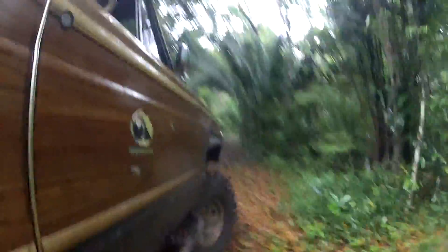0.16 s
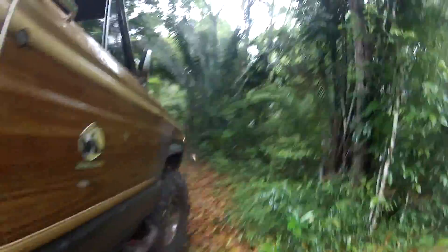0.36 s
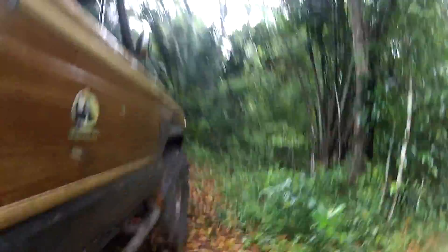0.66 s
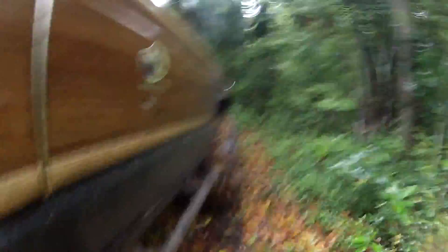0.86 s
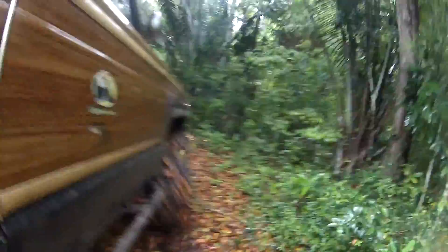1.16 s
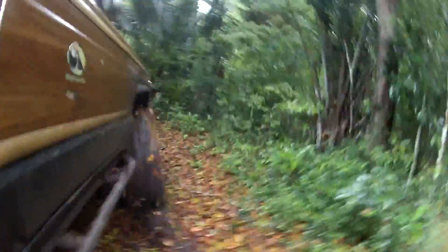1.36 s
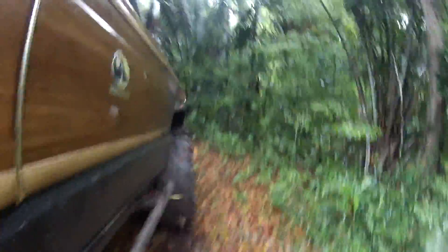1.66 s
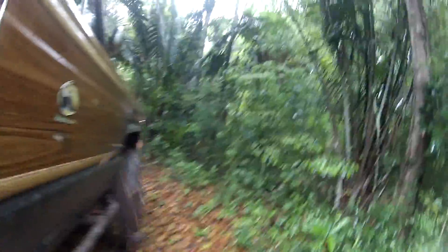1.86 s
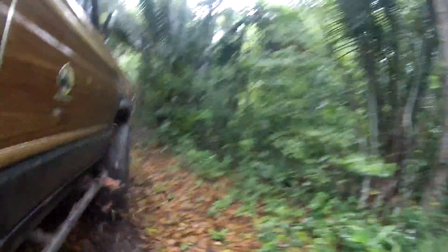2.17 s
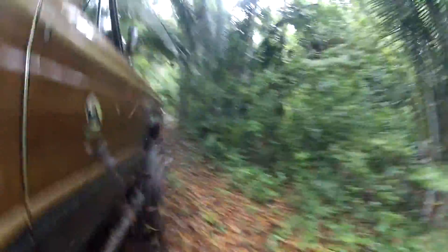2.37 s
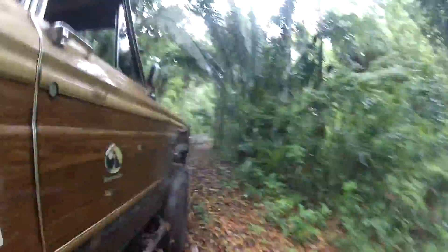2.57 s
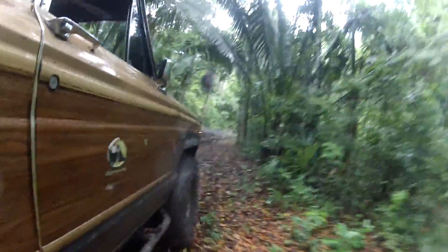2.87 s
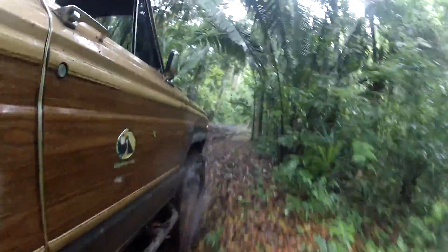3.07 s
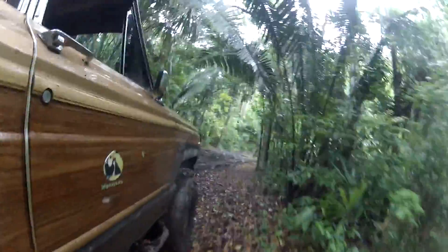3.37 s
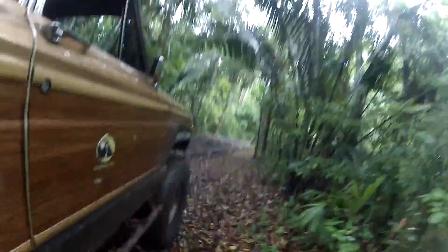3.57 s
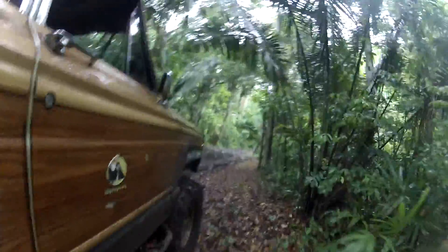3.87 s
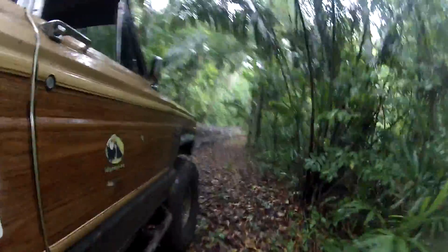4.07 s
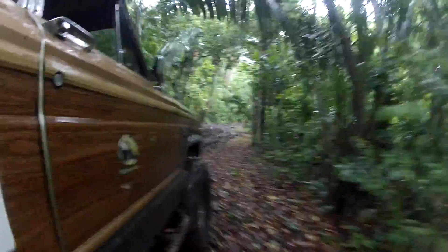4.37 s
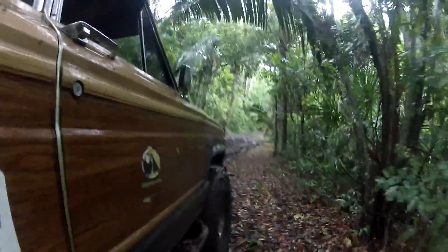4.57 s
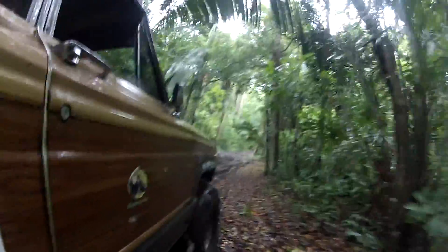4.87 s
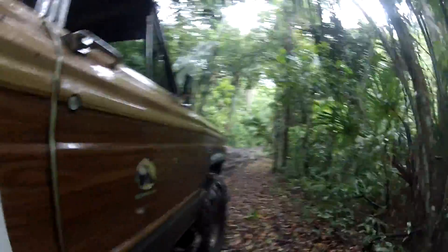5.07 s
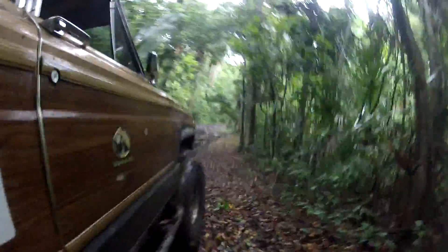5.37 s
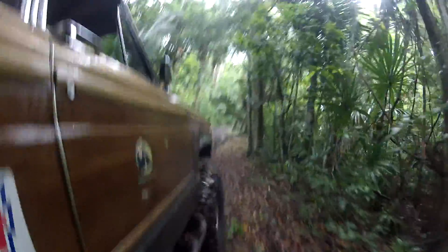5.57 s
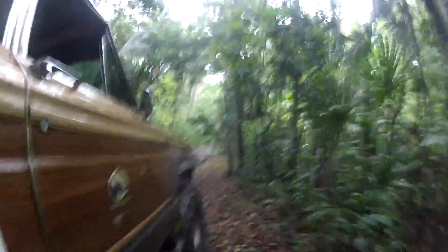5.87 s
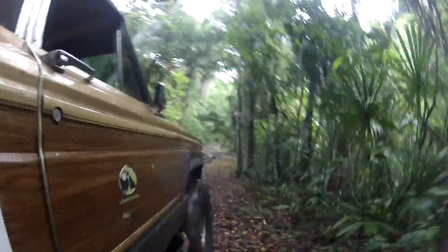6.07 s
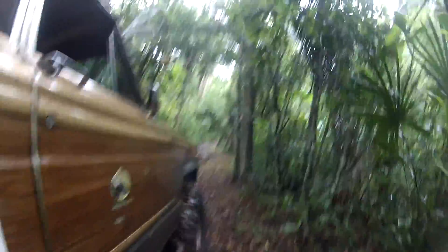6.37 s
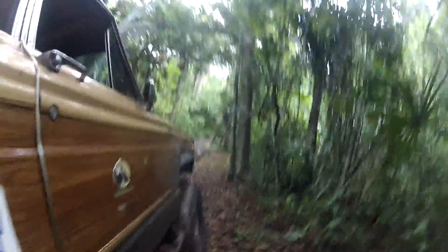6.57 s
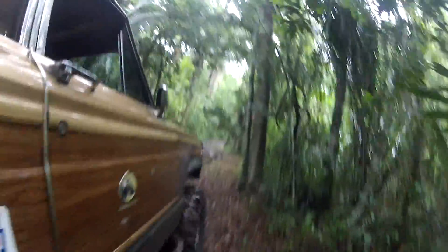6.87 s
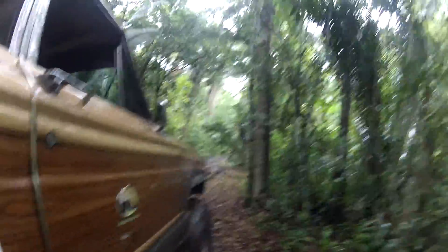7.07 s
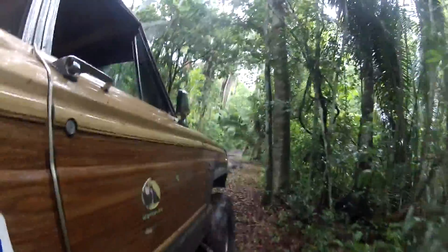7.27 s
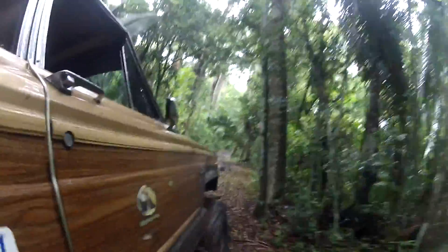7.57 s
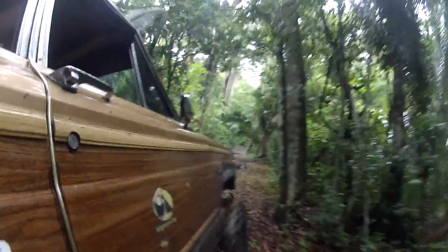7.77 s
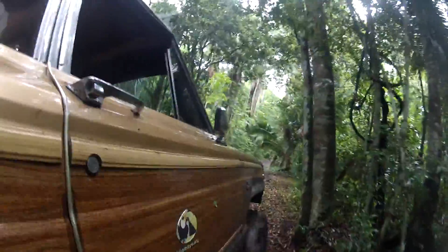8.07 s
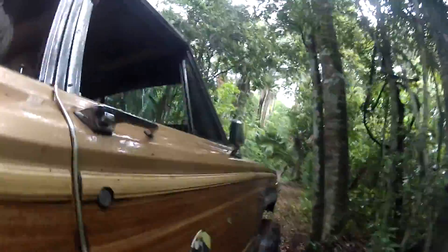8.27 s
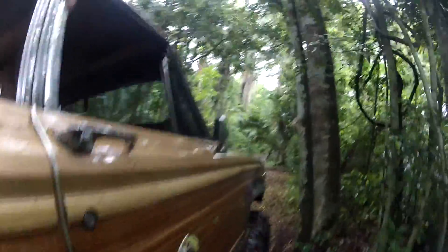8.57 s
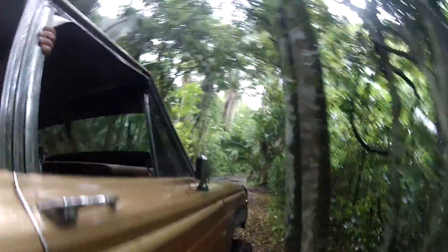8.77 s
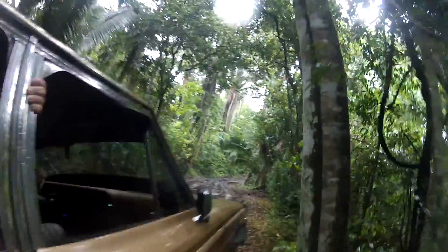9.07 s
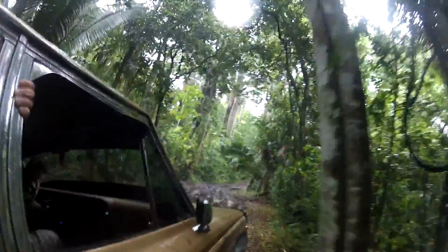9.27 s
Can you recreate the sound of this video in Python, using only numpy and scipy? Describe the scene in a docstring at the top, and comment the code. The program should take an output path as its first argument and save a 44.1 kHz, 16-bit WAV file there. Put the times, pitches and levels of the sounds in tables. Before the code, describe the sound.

An old V8 off-road truck crawls over a rutted forest track, heard close, just outside a side window. It opens with a brief rev, a knock and a low body thump. The revs sag, and a cluster of thumps comes between 0.7 and 1 second, ending in two faint metallic pings. From 1 to 2.4 seconds the engine climbs with a hard, rasping exhaust bark; a stone cracks brightly against metal at 1.7 seconds, and another thump lands at 2.4. Shorter throttle bursts follow around 2.8, 3.4 and 4 seconds, the revs dipping between them. From about 4.3 seconds the engine holds a quieter, loping tick-over with faint fan rush and valve clatter over low tyre rumble. Light clicks of twigs and loose fittings are scattered through the later part, with a knock and thump at 6.7 seconds and a stronger group near 8.8. The engine keeps throbbing until about 9.4 seconds.

```python
"""The exhaust of an old V8 off-road truck, heard just outside the side window on a rutted forest track.
Eight unequal gas pulses a cycle excite the pipe's resonances: under throttle their fronts steepen into
a bark, then the engine settles to a loping tick-over. The fan rushes and the valve gear clatters.
As the truck crawls along, impacts make its body knock and thump, a stone strikes it and the tyres rumble."""
import sys
import numpy as np
from scipy import signal
from scipy.fft import rfft, irfft, next_fast_len
from scipy.io import wavfile
from scipy.ndimage import map_coordinates

SR = 44100
rng = np.random.default_rng(int(sys.argv[2]) if len(sys.argv) > 2 else 0)


def wav_out(sig):
    """Save sig, one row per channel (or a flat mono array), as 16-bit PCM at SR to the path in sys.argv[1]."""
    wavfile.write(sys.argv[1], SR, np.round(np.clip(np.atleast_2d(sig).T, -1, 1) * 32767).astype(np.int16))


N = 415863

# Engine speed. Each row: time in seconds, firings per second.
FIRING_RATE = [(0.0, 119.2), (0.15, 120.7), (0.28, 97.1), (0.92, 63.4), (1.08, 99.9), (1.29, 116.2),
               (1.56, 119.8), (1.93, 133.1), (2.43, 137.7), (2.69, 103.2), (3.03, 108.8), (3.2, 59.0),
               (3.44, 109.2), (3.67, 114.8), (3.92, 60.9), (4.32, 78.7), (4.76, 77.5), (5.4, 78.4),
               (7.0, 77.5), (8.2, 75.2), (9.43, 77.0)]
# Pushes of the pedal. Each row: press, lift and time to open in seconds, opening from 0 to 1.
PEDAL_PUSHES = [(-.1, 0.114, 0.075, 0.75), (0.83, 0.976, .1, 0.98), (0.999, 2.448, 0.11, 0.92),
                (2.56, 2.966, 0.29, 0.96), (3.15, 3.281, 0.12, 0.93), (3.237, 3.639, 0.15, 0.97),
                (3.857, 4.12, .17, 0.7)]
# Cylinders in firing order. Each row: idle lag in firings, idle level in dB, loaded lag in firings,
# loaded level in dB, valve tap level in dB. The levels are relative.
FIRING_ORDER = [(0.811, -2, 0.593, 1, 6.5), (1.043, 0.5, 0.584, 4.5, -1), (1.04, -2, 0.703, 9, 1),
                (1.073, 5, 0.547, 7.5, 10), (1.156, 3, 0.777, -3.5, 10.5), (1.06, 5, 0.784, 6, 7),
                (0.833, -3.5, 0.596, 9, -7), (1.239, -1, 0.625, 6.5, 7.5)]
# Each cylinder's steep front. Each row: lag in firings, relative level at full load in dB.
STEEP_FRONTS = [(.9, -12), (.48, -1.5), (.64, 0), (.95, -11), (.55, -2), (.78, -5), (.32, -9), (.63, 1.5)]
# Standing waves of the tail pipe. Each row: frequency in Hz, bandwidth in Hz, relative gain in dB.
TAILPIPE_MODES = [(481, 7.5, -5.5), (556.3, 4.7, 7), (629.5, 6.9, 12.5), (731, 5.3, 13), (849, 4, 11.5),
                  (941.6, 19, 3.5), (1057, 4.7, 0), (1230, 6.1, -0.5)]
# Spectral envelopes. Each row: frequency in Hz, relative level in dB.
IDLE_PIPE_SPECTRUM = [(20, 2), (35, -5), (70, -6.5), (98, 7.5), (130, -14.5), (172, -1), (230, -10),
                      (300, -3.5), (375, -6), (450, -23.5), (800, -22), (1500, -70.5)]
LOADED_PIPE_SPECTRUM = [(20, -6), (35, -10), (70, 11), (98, 12.5), (130, 1.5), (155, -14.5), (183, 9.5),
                        (212, -1.5), (250, -3.5), (283, 1), (330, -7.5), (380, -8), (480, -25.5),
                        (900, -45)]
BARK_SPECTRUM = [(250, -45.5), (420, -7), (477, 1), (514, -17), (551, 7), (594, -1.5), (640, 1),
                 (693, -0.5), (739, -2.5), (985, 1.5), (1160, -37.5), (1210, -12.5), (1500, -17),
                 (1950, -46), (3300, -120)]
JET_SPECTRUM = [(710, -21), (1200, 6.5), (1710, -8), (1920, 7.5), (2510, 12), (3180, -8.5), (5200, -1),
                (5980, -8.5), (6800, 0.5), (8700, -71), (9680, 2), (10500, -14), (11400, -0.5),
                (14400, -11), (15500, -18)]
FAN_SPECTRUM = [(590, -15), (1000, -13.5), (1130, -12), (1530, -7.5), (1700, -11.5), (2220, 1),
                (2420, -1.5), (2770, -9.5), (2970, -12), (3160, -16), (4230, -11), (4680, -20),
                (5180, -10.5), (6010, -22), (6500, -15.5), (8450, -51), (14300, -120)]
FIZZ_SPECTRUM = [(3530, -31), (6000, -22), (6790, 4), (7410, -4.5), (7950, 2.5), (8650, -11.5), (9700, 8.5),
                 (10100, 2), (10500, -52), (11500, -0.5), (12600, -11), (13400, -5), (14500, 4.5),
                 (14800, -34), (15500, -29)]
VALVE_COVER_SPECTRUM = [(1200, -68), (1950, 3.5), (2150, 0), (2240, 11), (2350, -12.5), (2700, -13),
                        (4000, -62)]
TYRE_SPECTRUM = [(12, -9), (25, -15), (33, -17), (50, -15), (100, -18), (200, -23), (400, -29),
                 (1000, -46.5), (2500, -57.5)]
# How each layer follows the engine. Each law: base level at idle in dB, then the change in dB
# at full throttle, per octave of speed and on overrun.
NOTE_LEVELS = (-40, 6.5, -3.5, -6)
THROB_LEVELS = (-41.5, 5, 5, -16)
BARK_LEVELS = (-58, 20.5, 4, -3.5)
BAY_LEVELS = (-54, 2.5, 3.5, 1)
# Knocks of twigs and loose fittings. Each row: start in seconds, level in dB, centre in Hz,
# 60 dB decay time in seconds, relative level of the bright tick in dB.
LIGHT_KNOCKS = [(0.095, -25.5, 890, 0.017, -22), (0.358, -38, 2970, 0.017, -7),
                (0.687, -41.5, 2840, 0.04, -4), (1.0055, -40, 5000, 0.0095, 7),
                (3.159, -40, 4030, 0.02, -4), (6.376, -41, 3380, 0.011, -10),
                (6.692, -22.5, 1640, 0.008, -22), (7.123, -39, 2960, 0.019, -4.5),
                (8.142, -42, 3980, .015, -6), (8.456, -41, 2270, 0.016, -6), (8.597, -39, 2000, 0.015, -16),
                (8.621, -35, 1900, .012, -9), (8.759, -32.5, 704, 0.018, -13),
                (8.7593, -25, 2100, 0.01, -10), (8.8827, -27, 2540, 0.011, -10)]
# The body bottoms on its springs. Each row: start in seconds, level in dB, pitch in Hz,
# 60 dB decay time in seconds.
BODY_THUMPS = [(.098, -11.5, 73, 0.081), (.708, -25.5, 98.6, 0.18), (0.78, -24.5, 93, 0.061),
               (0.817, -12.5, 87.5, 0.031), (0.934, -13, 73.5, 0.13), (2.419, -18, 154, 0.16),
               (5.97, -37, 110, 0.23), (6.612, -29, 95, .08), (6.703, -22, 109.7, 0.11),
               (8.76, -16.5, 90, 0.09), (8.906, -28, 95, 0.062)]
# A loose metal fitting pings. Each row: start in seconds, level in dB.
FITTING_PINGS = [(.974, -39), (1.005, -38.5)]
# Metal struck by the stone. Each row: frequency in Hz, relative level in dB, 60 dB decay time in seconds.
METAL_MODES = [(1450, -7.5, 0.013), (2280, -0.5, 0.01), (2600, 3, 0.006), (3600, -0.5, 0.011),
               (4550, 2.5, 0.0064), (7370, -1, 0.0068), (8500, -6.5, 0.01), (9600, -6, .007),
               (14400, -9, .007)]
# Slow changes along the track. Each row: time in seconds, tyre level in dB, engine bay offset in dB.
TRACK_LEVELS = [(0, -30, 2), (.4, -44, 2), (.9, -44, 3.5), (1.4, -37.5, 1), (2.36, -32, 3.5),
                (2.8, -39.5, 0), (3.25, -44.5, 2.5), (3.8, -41.5, -0.8), (4.7, -45, 0.6), (6.5, -43, 0.2),
                (7.4, -44.5, 0), (8.75, -43.5, -2.6), (9.43, -51, -0.5)]

IDLE_HZ = 84.2  # reference firing rate of the level laws
CLOSE_S = .13  # time constant of the closing throttle
COAST_HZ_PER_S, COAST_LAG_S = 58, .09  # fall in firing rate for full overrun; lag as cylinders starve
BOOM_HZ, BOOM_WIDTH_HZ, BOOM_DB = 101.4, 11.9, 9.5  # the firing note booms at the pipe's lowest resonance
BARK_POWER = 1.84  # the fronts steepen only once the throttle is well open
PING_HZ, PING_T60_S = (2070, 2190), .07
STONE_S, STONE_DB = 1.6625, -13
TOP_HZ = 15300


def exhaust(crank, load, note_db, throb_db, bark_db, bay_db):
    """Pulse excitation: unequal blow-downs ring the pipe; under load their fronts steepen into a bark."""
    firing = np.arange(int(crank[-1]))
    idle_lag, idle_db, loaded_lag, loaded_db, _ = np.array(FIRING_ORDER)[firing % len(FIRING_ORDER)].T
    front_lag, front_db = np.array(STEEP_FRONTS)[firing % len(STEEP_FRONTS)].T
    jitter, strength, sharpness = rng.standard_normal((len(firing), 3)).T
    angle = firing + .008 * jitter
    idle = coloured(pulses(crank, angle + idle_lag, amp(idle_db + .5 * strength)), IDLE_PIPE_SPECTRUM)
    loaded = coloured(pulses(crank, angle + loaded_lag, amp(loaded_db + strength)), LOADED_PIPE_SPECTRUM)
    pipe = np.sqrt(1 - load) * steady(idle) + np.sqrt(load) * steady(loaded)
    # the throb is the pipe's sound without its component at the firing rate
    note, window = np.exp(2j * np.pi * crank), np.hanning(SR // 4)
    at_firing_rate = 2 * np.real(note * signal.fftconvolve(pipe / note, window / window.sum(), "same"))
    throb = steady(pipe - at_firing_rate)
    effort = np.interp(firing, crank, load)  # the cylinders bark more unequally the harder they work
    fronts = pulses(crank, angle + front_lag, amp(effort * front_db + 1.7 * sharpness))
    gas = unit(puffs(fronts, life_s=.0024))  # turbulent gas follows each front
    edge = (.25 + .8 * load) * steady(coloured(fronts, BARK_SPECTRUM))
    ring = (.5 + .25 * load) * steady(ringing(fronts, TAILPIPE_MODES))
    rasp = (.55 - .3 * load) * noise(BARK_SPECTRUM, gas + .6)
    bark = steady(edge + ring + rasp)
    jet = load * noise(JET_SPECTRUM, gas + 1.5)
    return amp(note_db) * note.real + amp(throb_db) * throb + amp(bark_db) * bark + amp(bay_db - .5) * jet


def throttle():
    """Ramp and relaxation: each push opens the throttle, holds it and lets it close exponentially."""
    t = np.arange(N) / SR
    pushes = [opening * np.clip((t - press) / rise, 0, 1) * np.exp(-np.maximum(t - lift, 0) / CLOSE_S)
              for press, lift, rise, opening in PEDAL_PUSHES]
    return np.max(pushes, axis=0)


def overrun(firing_hz, pedal):
    """First-order lag, 0 to 1: with the throttle shut and the revs falling, the cylinders starve."""
    falling = np.clip(-np.gradient(firing_hz) * SR / COAST_HZ_PER_S, 0, 1)
    return puffs(falling, COAST_LAG_S) / (COAST_LAG_S * SR) * np.clip(1 - pedal, 0, 1)


def engine_bay(crank, load, bay_db):
    """Amplitude modulation: valve taps pulse the fan's rush, a fine fizz and the cover's chatter."""
    valve = np.arange(int(crank[-1]))
    jitter, hardness = rng.standard_normal((len(valve), 2)).T
    tap_db = np.array(FIRING_ORDER)[valve % len(FIRING_ORDER), -1] + 3 * hardness
    strikes = pulses(crank, valve - .12 + .062 * jitter, amp(tap_db))
    taps = unit(puffs(strikes, life_s=.0063))
    lope = np.cos(2 * np.pi * crank / len(FIRING_ORDER))  # one swell in each engine cycle
    fan = noise(FAN_SPECTRUM, 1 + .22 * taps) * amp(1.1 * wobble(22))
    chatter = noise(VALVE_COVER_SPECTRUM, taps) * amp(2 * wobble(14) + 2.3 * lope)
    fizz = noise(FIZZ_SPECTRUM, 1 + .55 * taps) * amp(.89 * wobble(12))
    return amp(bay_db - 1.1 * load) * (amp(-1) * fan + amp(-5.5) * chatter) + amp(bay_db - 9.5) * fizz


def body():
    """Damped vibration after impact: dry knocks, low thumps of the panels and a fitting's pings."""
    track, t = np.zeros(N), np.arange(SR // 4) / SR
    for start, db, centre_hz, t60, tick_db in LIGHT_KNOCKS:
        knock = burst(len(t), centre_hz, relative_width=.42)
        tick = amp(tick_db) * burst(len(t), centre_hz=7900, relative_width=1)
        add(track, start, amp(db - 60 * t / t60) * attack(t, .0014) * (knock + tick))
    for start, db, pitch_hz, t60 in BODY_THUMPS:
        add(track, start, amp(db - 60 * t / t60) * attack(t, .0039) * np.sin(2 * np.pi * pitch_hz * t))
    ping = sum(np.sin(2 * np.pi * hz * t) for hz in PING_HZ)
    for start, db in FITTING_PINGS:
        add(track, start, amp(db - 60 * t / PING_T60_S) * ping)
    return track


def stone():
    """Modal ringing: a stone strikes nearby metal, whose heavily damped modes give one bright crack."""
    track, t = np.zeros(N), np.arange(SR // 20) / SR
    ring = sum(amp(db - 60 * t / t60) * np.sin(2 * np.pi * hz * t) for hz, db, t60 in METAL_MODES)
    add(track, STONE_S, amp(STONE_DB) * attack(t, .0002) * ring)
    return track


def tyres(roll_db):
    """Random excitation: the ruts shake the tyres into a low rumble."""
    return amp(roll_db) * noise(TYRE_SPECTRUM)


def amp(db):
    """Decibels as an amplitude ratio."""
    return 10 ** (np.asarray(db) / 20)


def unit(x):
    """Normalisation to rms 1."""
    return x / np.sqrt(np.mean(x ** 2) + 1e-20)


def steady(x):
    """Running normalisation to rms 1 over a third of a second."""
    window = np.hanning(SR // 3)
    power = signal.fftconvolve(x ** 2, window, "same") / signal.fftconvolve(np.ones(N), window, "same")
    return x / np.sqrt(np.abs(power) + 1e-20)


def curves(rows):
    """Linear interpolation of each column after the time, one value per sample."""
    times, *columns = np.transpose(rows)
    return [np.interp(np.arange(N) / SR, times, column) for column in columns]


def wobble(rate):
    """Spline interpolation of random knots, rate of them a second."""
    return map_coordinates(rng.standard_normal(int(N * rate / SR) + 4), [np.arange(N) * rate / SR])


def coloured(x, spectrum, size=8192):
    """Minimum-phase filtering of x by a spectral envelope."""
    hz, db = np.transpose(spectrum)
    gain = amp(np.interp(np.log(np.fft.rfftfreq(size, 1 / SR) + 1), np.log(hz + 1), db))
    cepstrum = irfft(np.log(np.maximum(gain, 1e-6)))
    cepstrum[1:size // 2] *= 2  # folding the cepstrum makes the filter causal
    cepstrum[size // 2 + 1:] = 0
    return signal.fftconvolve(x, irfft(np.exp(rfft(cepstrum))))[:N]


def noise(spectrum, gate=1):
    """Source and filter: gated white noise, coloured and scaled to rms 1."""
    return unit(coloured(gate * rng.standard_normal(N), spectrum))


def burst(size, centre_hz, relative_width):
    """Band-pass filtering: noise of rms 1 through two like resonators in series."""
    hz = np.fft.rfftfreq(size, 1 / SR)
    band = 1j * hz * centre_hz / (centre_hz ** 2 - hz ** 2 + 1j * relative_width * hz * centre_hz)
    return unit(irfft(rfft(rng.standard_normal(size)) * band ** 2, size))


def ringing(x, modes):
    """Resonance: x drives narrow modes in parallel."""
    return sum(amp(db) * signal.lfilter(*signal.iirpeak(hz, hz / width, SR), x) for hz, width, db in modes)


def pulses(crank, angles, sizes):
    """An impulse train: one impulse wherever the crank passes an angle."""
    at = np.interp(angles, crank, np.arange(N))
    return np.bincount(np.round(at).astype(int), sizes * (at > 0) * (at < N - 1), N)


def puffs(train, life_s):
    """Leaky integration: each impulse decays with time constant life_s."""
    return signal.lfilter([1], [1, -np.exp(-1 / (life_s * SR))], train)


def attack(t, rise_s):
    """Exponential approach from 0 to 1."""
    return 1 - np.exp(-t / rise_s)


def add(track, start_s, sound):
    """Superposition of a sound on the track."""
    part = track[round(start_s * SR):][:len(sound)]
    part += sound[:len(part)]


def scene():
    """Superposition of all sources; throttle and engine speed govern the engine's layers."""
    firing_hz, = curves(FIRING_RATE)
    roll_db, bay_offset_db = curves(TRACK_LEVELS)
    crank = np.cumsum(firing_hz) / SR  # counted in firings
    pedal = throttle()
    octaves, coast = np.log2(firing_hz / IDLE_HZ), overrun(firing_hz, pedal)
    level = lambda law, drive: law[0] + law[1] * drive + law[2] * octaves + law[3] * coast
    boom_db = BOOM_DB * np.exp(-((firing_hz - BOOM_HZ) / BOOM_WIDTH_HZ) ** 2)
    note_db = level(NOTE_LEVELS, pedal) + boom_db
    throb_db = level(THROB_LEVELS, pedal)
    bark_db = level(BARK_LEVELS, pedal ** BARK_POWER)
    bay_db = level(BAY_LEVELS, pedal) + bay_offset_db
    load = np.clip((bark_db + 54.5) / 9, 0, 1)  # a harder bark stands for a heavier load
    engine = exhaust(crank, load, note_db, throb_db, bark_db, bay_db) + engine_bay(crank, load, bay_db)
    return (engine + tyres(roll_db) + body() + stone())[None]


def record(dry):
    """Linear filtering: a cut of the deepest rumble, a notch in the treble and a band limit."""
    size = next_fast_len(N + SR // 2)
    hz = np.fft.rfftfreq(size, 1 / SR)
    low_cut = hz ** 2 / (hz ** 2 + 12 ** 2)
    notch = amp(-9 * np.exp(-((hz - 6020) / 520) ** 2))
    return irfft(rfft(dry, size) * notch * low_cut * (hz < TOP_HZ), size)[..., :N]


dry = scene()
out = record(dry)
wav_out(out)
```